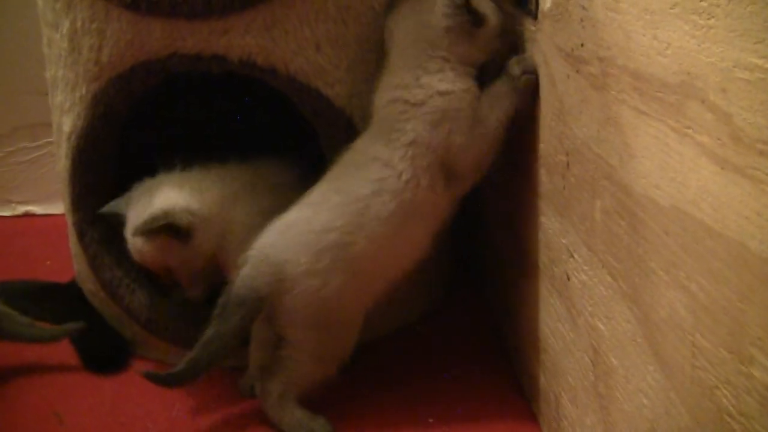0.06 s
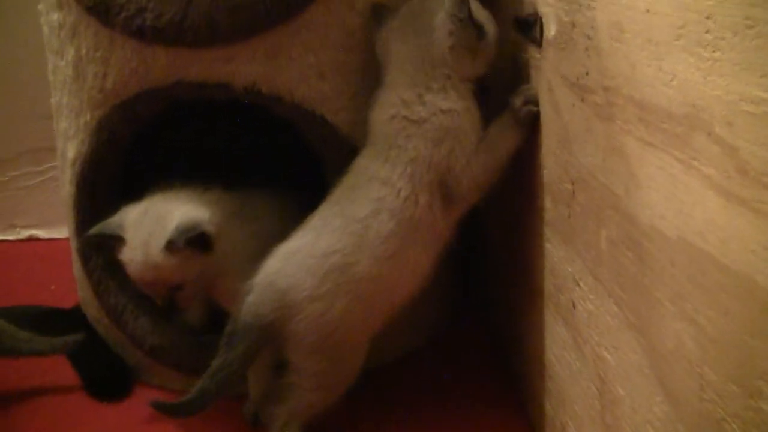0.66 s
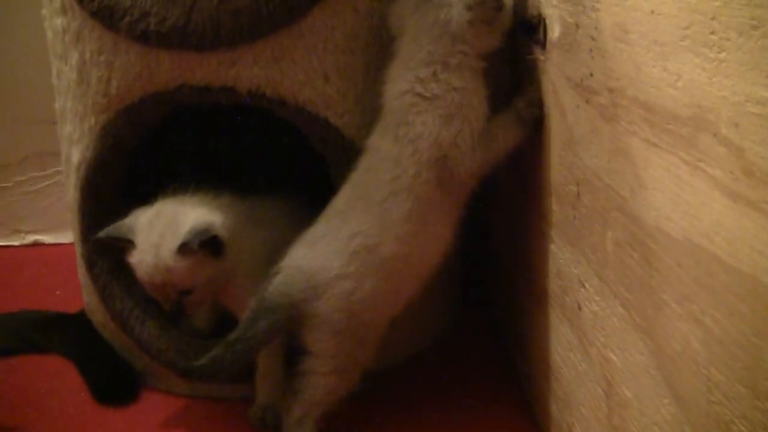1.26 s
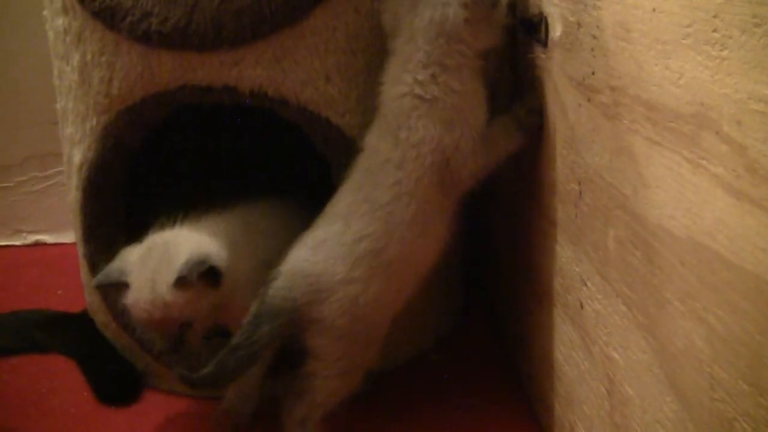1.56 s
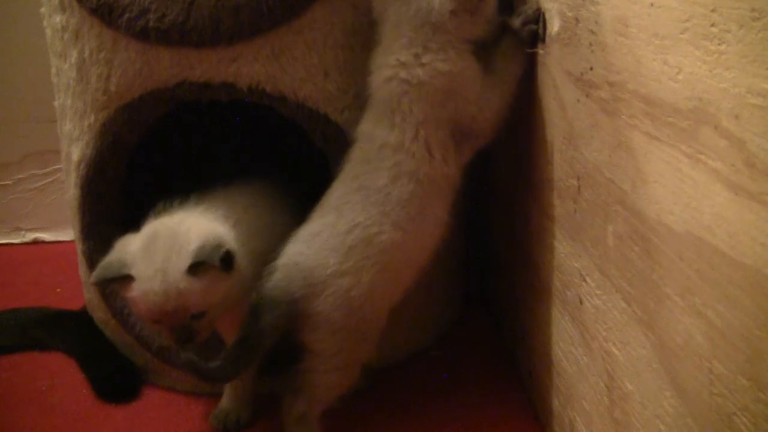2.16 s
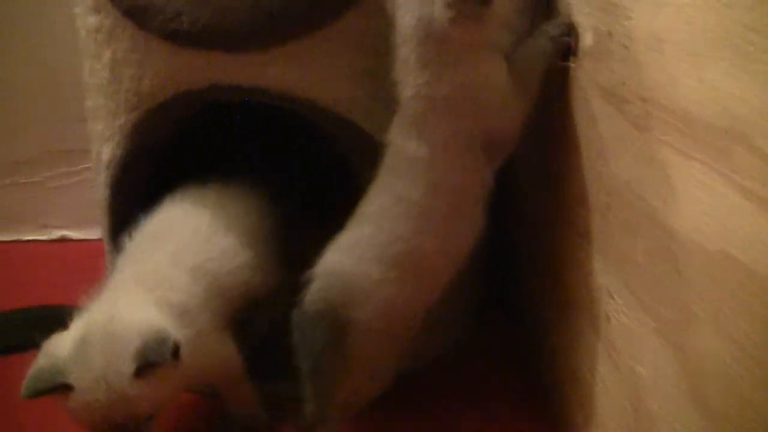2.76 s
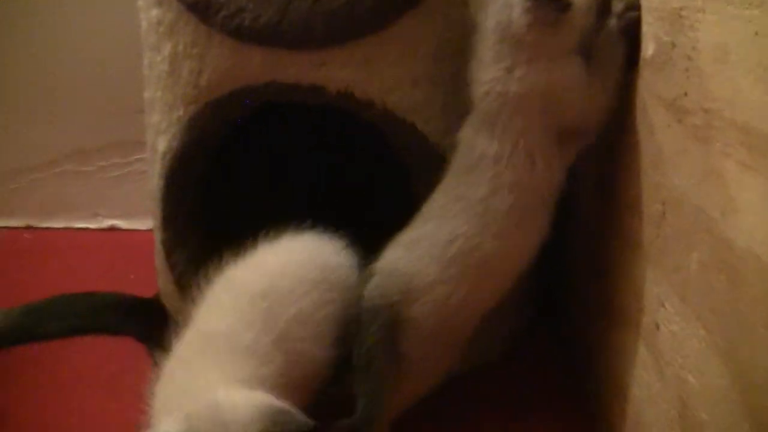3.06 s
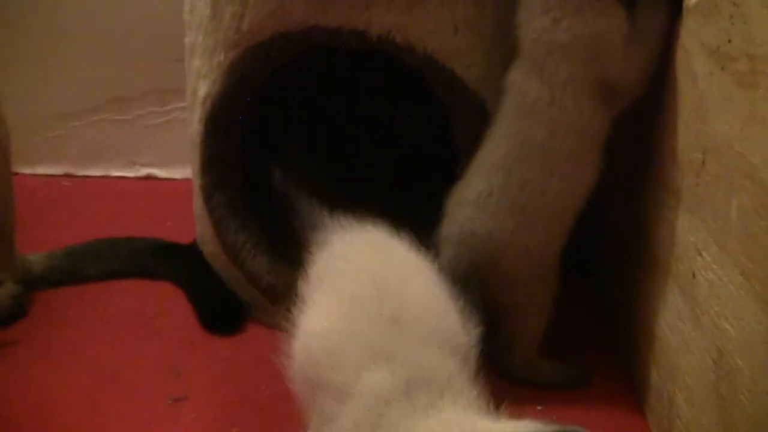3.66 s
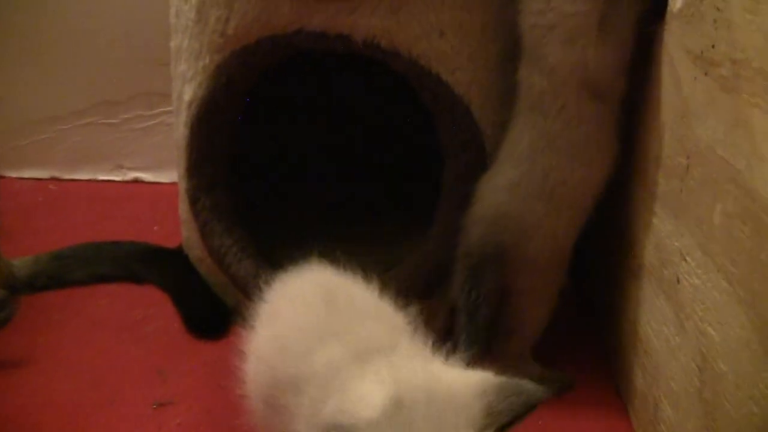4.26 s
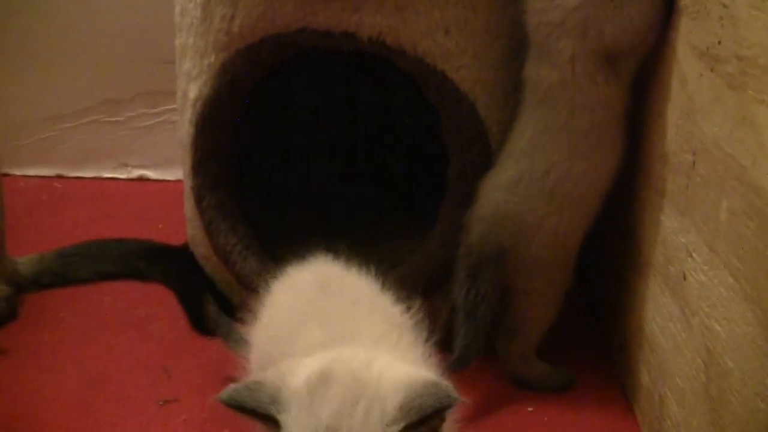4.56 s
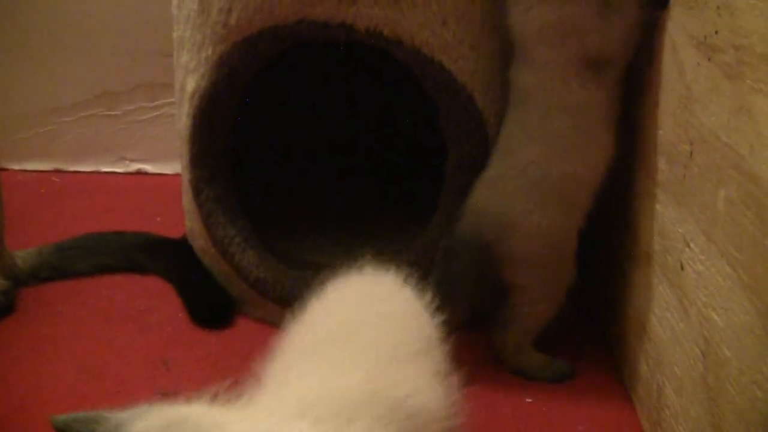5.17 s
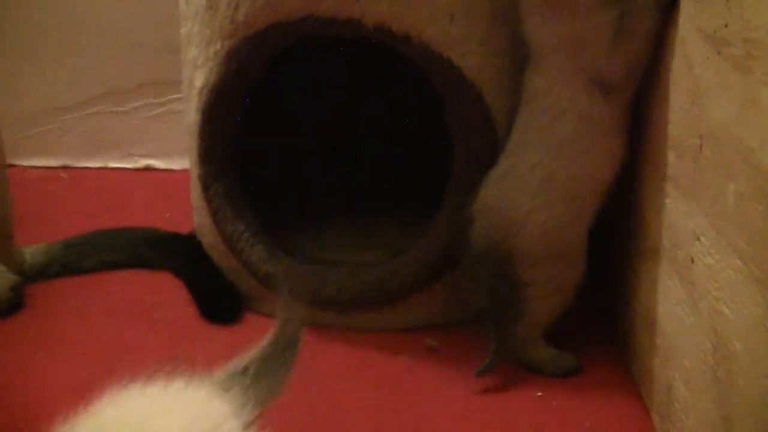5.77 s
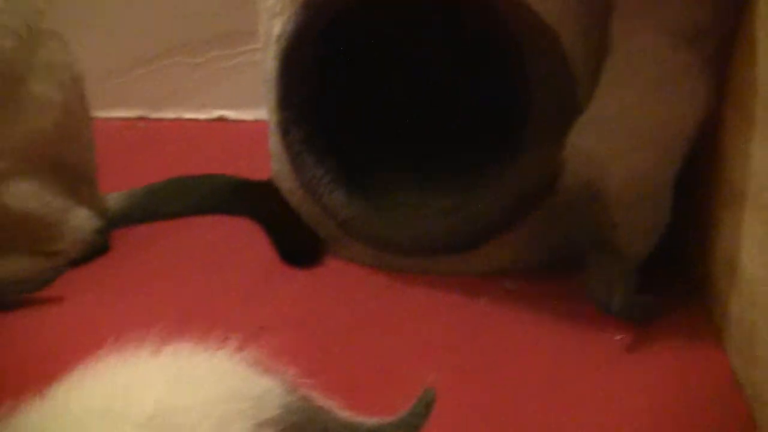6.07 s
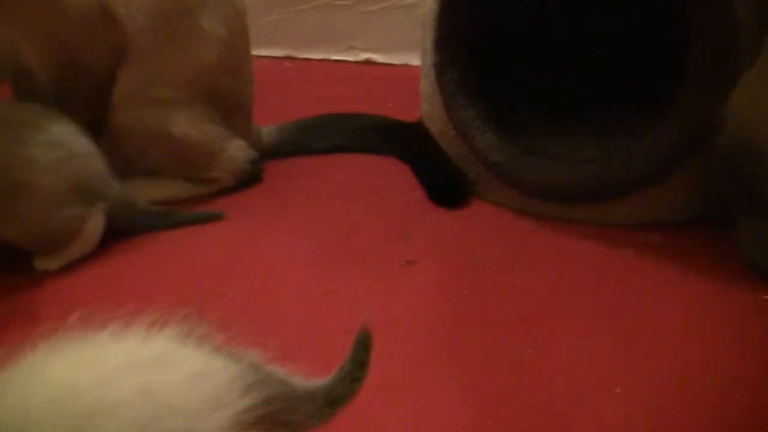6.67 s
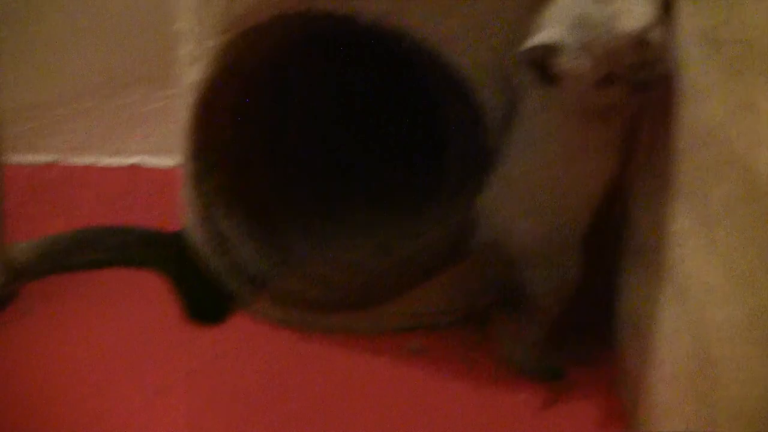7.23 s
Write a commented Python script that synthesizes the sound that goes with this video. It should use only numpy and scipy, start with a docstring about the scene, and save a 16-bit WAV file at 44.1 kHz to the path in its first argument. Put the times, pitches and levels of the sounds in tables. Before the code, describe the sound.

Small, close claw clicks and brief scrapes on wood, mixed with dull kitten footfalls, in a quiet room with faint rapid ticking.

```python
"""A small furnished room, the camera's microphone close to a plywood panel.
A kitten stands against the panel and paws at it; another pads out of a cat house.
Claws tap and drag, ringing the wood; soft paws thud on the hollow floor; the room answers briefly.
Under it lie room rumble, hiss, mains hum and the faint fast ticking of a small motor,
likely the camera's own."""
import sys
import numpy as np
from scipy import signal
from scipy.fft import rfft, irfft
from scipy.io import wavfile
from scipy.ndimage import uniform_filter1d

SR = 44100
rng = np.random.default_rng(int(sys.argv[2]) if len(sys.argv) > 2 else 0)


def transcribe(signal):
    """Save signal, clipped to [-1, 1], as a 16-bit WAV file at the path in sys.argv[1]."""
    frames = np.atleast_2d(signal).T
    limited = np.clip(frames, -1, 1)
    pcm = np.round(limited * 32767).astype(np.int16)
    wavfile.write(sys.argv[1], SR, pcm)


N = 330750
SIZE = 32768  # samples in one blow
HZ, T = np.fft.rfftfreq(SIZE, 1 / SR), np.arange(SIZE) / SR


def taps(usual_db=-46, usual_t60=0.097, halving_db=19.5, crunch_db=1, crunch_t60=0.009):
    """Close taps, nearly all claws on the panel: a click, a sharp push, a crunch of wood fibres."""
    # Each row: start in seconds, level in dB, weight in dB, brightness in dB per octave,
    # favoured note in Hz, its lift in dB.
    # The rows at 1.178 and 1.226 s are two faint 1.8 kHz ticks of the small motor.
    hits = [(0.212, -51, 4, 2, 3600, -4), (0.644, -55.5, 7, 0.5, 7000, 5), (0.826, -54, 16, -4, 302, 9.5),
            (0.864, -57, 4, -0.5, 4000, 6), (0.981, -55, 0, -1.5, 3200, 4), (1.178, -55, 7, -6, 1800, 14),
            (1.226, -61, 7, -3, 1800, 13), (1.859, -45, -9, -4, 650, 18), (2.14, -51.5, -6, -2.5, 2670, 3),
            (2.2007, -42, -5, 2.5, 3350, 6), (2.488, -38.5, -1, -3.5, 2140, 3.5),
            (2.494, -46.5, -7, -2.5, 5800, 1), (2.728, -52, 0, -2, 5400, 6),
            (2.9443, -43.5, 8, 2, 4660, 3.5), (3.125, -49.5, 13, 0.5, 1310, 18),
            (3.286, -35, 0.5, -2, 1320, 7), (3.334, -53.5, -8, -9, 2000, 6), (3.397, -45.5, 4, -5, 1130, 5),
            (3.4093, -29.5, -1, -7.5, 9800, 15), (3.4182, -34, -3, -3, 2400, 1),
            (3.493, -45, 6, -1.5, 1140, 11.5), (3.759, -44.5, 5.5, -3, 1050, 6),
            (3.79, -45, -0.5, -3, 1040, 6), (3.86, -55.5, -5, 0.5, 760, 2), (4.402, -51, -20, -3, 890, 1),
            (4.516, -49.5, 3.5, 0, 3670, 5), (4.851, -46.5, 13.5, 1.5, 1300, 14),
            (4.9091, -41.5, 12, 0, 1350, 10), (4.954, -55.5, 8, 3, 1130, 6),
            (5.008, -44, -2.5, -1.5, 885, 9), (5.122, -48.5, 9, -2.5, 890, 10),
            (5.235, -59, 4, -2.5, 10500, 25), (5.408, -51.5, -1, -1, 2600, 7), (5.87, -59, 7, 1, 1430, 12),
            (6.935, -36.5, 16.5, 0.5, 1370, 16.5), (7.271, -46, 5.5, -9.5, 1200, 1.5)]
    out = np.zeros((2, N))
    for start, db, weight_db, bright_db, spot_hz, spot_db in hits:
        force_db = db - usual_db
        bass_db = 4 + 0.7 * weight_db - 0.37 * force_db  # gentle taps are more pad than claw
        t60 = usual_t60 * 2 ** (-max(force_db, 0) / halving_db)  # hard taps press and damp the panel
        push = (T == 0) + amp(crunch_db) * unit(rng.standard_normal(SIZE) * fade(T, crunch_t60))
        add(out, start, panel(push, db, 0.02, bass_db, weight_db, bright_db, spot_hz, spot_db, t60))
        add(out, start, claw_tip(db - 1 + 1.5 * bright_db))
    return out


def claw_tip(db, click_s=0.0012, low_hz=3300, high_hz=9000, side_db=-8):
    """The tiny dry click of the claw itself, straight through the air to the microphone."""
    burst = rfft(rng.standard_normal((2, SIZE)) * np.exp(-T / click_s))
    band = 1 / (1 + (low_hz / (HZ + 1)) ** 4) / (1 + (HZ / high_hz) ** 6)
    return amp([[db], [db + side_db]]) * irfft(burst * causal(band))


def claw_scrapes():
    """Firm strokes of the claws down the panel."""
    # Each row: start and length in seconds, level in dB, paw weight in dB, brightness in dB per octave.
    strokes = [(0.213, 0.082, -44, 3.5, 0), (0.3, 0.035, -56, 6.5, 0), (0.652, 0.0086, -46.7, -8, -1),
               (0.993, 0.025, -46.5, 0, -3), (1.09, 0.025, -48, 6.5, -1.5), (1.158, 0.025, -54, -1, -6.5),
               (1.298, 0.043, -42.5, 1, -1.3), (1.418, 0.029, -45.5, 3.5, 0),
               (1.621, 0.02, -55.5, -0.5, -6), (1.862, 0.028, -48.5, 1.5, -3),
               (2.796, 0.014, -55, 2.5, -15), (2.923, 0.029, -46.5, 4, 2), (3.506, 0.021, -49, 0, -6),
               (3.683, 0.011, -52, 6, -10), (3.805, 0.037, -55.5, -2, -10), (4.26, 0.062, -60.5, 0, -8),
               (4.409, 0.014, -46, 0, -12), (4.434, 0.037, -53, -1, -1.5), (4.916, 0.082, -49, 2.5, -3),
               (5.023, 0.058, -52, 0, -5.5), (5.082, 0.048, -48, 7, -7), (5.647, 0.036, -53, 3, -2),
               (5.94, 0.023, -52, -3, -3), (6.45, 0.016, -58.5, -13, -5)]
    out = np.zeros((2, N))
    for start, length, db, weight_db, bright_db in strokes:
        add(out, start, claw_drag(length, db, weight_db, bright_db))
    return out


def claw_drag(length, db, weight_db, bright_db, slips_per_s=700, spread_db=4, catch=0.79, rub=0.13):
    """A dragged claw catches, then slips on the grain: many uneven pushes under one swelling stroke."""
    slips = rng.random(SIZE) < slips_per_s / SR
    slips = slips * amp(spread_db * np.minimum(rng.exponential(1, SIZE), 2))
    grip = np.interp(T / length, [0, 0.48, 1], [0.75, 1, 0.23], right=0)
    push = grip * (catch * (T == 0) + slips * rng.choice([-1, 1], SIZE) + rub * rng.standard_normal(SIZE))
    return panel(push, db, length, bass_db=3, knock_db=weight_db, bright_db=bright_db,
                 spot_hz=3600, spot_db=4, t60=0.073, scatter_db=-3)


def claw_fidgets(count=18, between_s=(0.7, 6.1), level_db=-61, spread_db=2):
    """Faint brief scuffs at loose intervals as the claws shift their hold."""
    out = np.zeros((2, N))
    for k, (when, size) in enumerate(rng.random((count, 2))):
        start = np.interp(k + when, [0, count], between_s)
        db = level_db + spread_db * (2 * size - 1)
        add(out, start, claw_drag(0.014, db, weight_db=-2, bright_db=-5))
    return out


def panel(push, db, span_s, bass_db, knock_db, bright_db, spot_hz, spot_db, t60, scatter_db=0):
    """Plywood rings under a push, in mid and side; db is its 400-8000 Hz level over span_s."""
    # Each row: a panel mode in Hz, its width in Hz, its lift over the broad response in dB.
    modes = [(89.5, 30, 12), (153, 21, 9), (333, 113, 7), (571, 82, 3), (481, 33, 7.5), (517.6, 22, 6.5),
             (632.6, 170, 14.5), (779, 12, 7.5), (1057, 54, 9.5), (1193, 48, 4), (1355, 250, 7.5),
             (1614, 18, 9.5), (1770, 18, 0.5), (1967, 73, 9), (1940, 23, 1), (2178, 75, 7.5), (2310, 24, 8),
             (2540, 33, 5), (2870, 460, 2.5), (2966, 48, 7), (3910, 74, 6)]
    # Each row: frequency in Hz, the wood's broad response in dB.
    wood = [(25, -41), (70, -10), (130, -5), (300, -2.5), (550, -7), (900, -8), (1400, -2.5), (3500, -3.5),
            (4600, -8.5), (7000, -14), (10300, -18), (11300, -33), (13000, -42), (16000, -56)]
    # Each row: frequency in Hz, side against mid in dB.
    wood_side = [(60, -26), (300, -31), (1300, -39), (2400, -19), (4400, -8), (9000, -4.5)]
    # bending waves run faster in the treble, so the first click is smeared
    travel_s = 0.0010164  # at 1 kHz
    direct = np.exp(-4j * np.pi * travel_s * np.sqrt(1000 * HZ))
    # they scatter off the edges, and the corner throws back one dull echo 3 ms later
    scatter = rfft(unit(rng.standard_normal((2, SIZE)) * fade(T, t60)))
    echo = amp(-1) * np.exp(-2j * np.pi * HZ * 0.002983) / (1 + 1j * HZ / 1100)
    mid = direct * (1 - echo) + amp(scatter_db) * scatter[0]
    side = amp(read(wood_side, HZ)) * scatter[1]
    waves = rfft(push, SIZE) * np.array([mid, side])
    # each spot favours other modes, most of all those around its own note
    modes_db = sum((lift + rng.standard_normal()) / (1 + (2 * (HZ - hz) / width) ** 2)
                   for hz, width, lift in modes)
    modes_db += spot_db * np.exp(-0.5 * (np.log2((HZ + 1) / spot_hz) / 0.3) ** 2)
    # the weight of the paw feeds the bass, the sharpness of the claw the treble
    touch_db = read([(190, bass_db), (420, knock_db), (700, knock_db), (1100, 0)], HZ)
    touch_db += bright_db * np.log2(np.maximum(HZ / 1500, 1))
    # chance sets the fine grain of a blow; wood and touch set its broad colour
    broad = np.sqrt(uniform_filter1d(abs(waves[0]) ** 2, size=800) + 1e-12)
    spectrum = waves * causal(amp(read(wood, HZ) + modes_db + touch_db) / broad)
    energy = 2 * np.sum(abs(spectrum[0, (HZ > 400) & (HZ < 8000)]) ** 2) / SIZE
    return irfft(spectrum) * amp(db) * np.sqrt(span_s * SR / energy)


def paw_thuds(gain_db=-1, rise_s=0.0027, t60=0.16, overtone_db=-7, puff_db=-11, puff_hz=300, side_db=-14):
    """A padded paw sets the hollow floor swinging for a few cycles, with a dull puff of carpet."""
    # Each row: start in seconds, relative level in dB, pitch of the floor in Hz.
    landings = [(1.861, -44, 91), (2.943, -41.5, 108), (3.288, -44, 147), (3.414, -42, 160),
                (3.543, -34.5, 91), (3.599, -46, 109.6), (5.036, -44, 169), (5.231, -49, 148),
                (5.719, -33.5, 107), (5.789, -48.5, 197), (6.22, -43.5, 100.6), (6.936, -38, 153),
                (7.271, -54, 96)]
    out = np.zeros((2, N))
    for start, db, hz in landings:
        swing = np.sin(2 * np.pi * hz * T) + amp(overtone_db) * np.sin(2 * np.pi * hz * 1.65 * T)
        puff = irfft(rfft(rng.standard_normal((2, SIZE))) / (1 + (HZ / puff_hz) ** 3))
        puff /= np.sqrt(np.mean(puff ** 2))
        envelope = amp(db + gain_db) * (1 - np.exp(-T / rise_s)) * fade(T, t60)
        add(out, start, envelope * np.array([swing + amp(puff_db) * puff[0], amp(side_db) * puff[1]]))
    return out


def room_tail(sound, mid_db=-15, side_db=-17, build_s=0.0047):
    """Near walls return a short diffuse tail, longest in the bass and shortest in the middle range."""
    # Each row: frequency in Hz, seconds to die away by 60 dB.
    decay_times = [(100, 0.53), (500, 0.11), (2000, 0.15), (10000, 0.35)]
    hz, t, noise = signal.stft(rng.standard_normal((2, SIZE)), SR, nperseg=256)
    envelope = fade(t, read(decay_times, hz)[:, None]) * (1 - np.exp(-t / build_s))
    tail = signal.istft(noise * envelope, SR, nperseg=256)[1]
    return amp([[mid_db], [side_db]]) * signal.fftconvolve(sound[:1], unit(tail), axes=1)[:, :N]


def motor_ticks(ticks_per_s=26.6, tick_db=-57.5, uneven_db=2.5, hard_db=-52, t60=0.032, side_db=-6):
    """A small motor ticks at an even pace into its housing, now and then harder."""
    # Each row: a housing mode in Hz, its width in Hz, its relative level in dB.
    housing = [(520, 450, 13.5), (772, 63, 4), (890, 250, -13.5), (1450, 140, -2), (1708, 44, -0.5),
               (2257, 81, -1.5), (2610, 124, 0)]
    # Each row: time in seconds, change in tick strength in dB.
    load = [(.7, -24), (1.3, 1.5), (7.5, 1.5)]
    # Each entry: start of a harder tick in seconds.
    hard_starts = [5.5868, 6.25, 6.52, 6.7366]
    out, t = np.zeros((2, N)), T[:SIZE // 8]
    ring = sum(amp(db) * np.exp(-np.pi * width * t) * np.sin(2 * np.pi * (hz * t + rng.random()))
               for hz, width, db in housing)
    ring *= 1 - np.exp(-t / 0.0017)  # softened onset
    beats = np.arange(0, N / SR, 1 / ticks_per_s)
    beat_db = tick_db + np.interp(beats, *np.transpose(load))
    beat_db += uneven_db * rng.standard_normal(len(beats))
    for start, db in [*zip(beats, beat_db), *[(s, hard_db) for s in hard_starts]]:
        rattle = unit(rng.standard_normal((2, len(t))) * fade(t, t60))
        tick = unit(signal.fftconvolve(rattle, ring[None], axes=1)) * np.linalg.norm(ring)
        add(out, start, amp([[db], [db + side_db]]) * tick)
    return out


def room_tone(noise_db=-58.5):
    """Steady room rumble and microphone hiss with a little mains hum."""
    # Each row: frequency in Hz, relative density of rumble and hiss in dB.
    colour = [(12, -28), (25, -1.5), (54, -7.5), (80, -1), (116, 1), (150, -4), (235, -3.5), (290, -8),
              (700, -11), (1500, -14.5), (3600, -22.5), (6500, -27.5), (10500, -32), (15500, -39)]
    # Each row: frequency in Hz, side against mid in dB.
    width = [(60, -3), (110, -12.5), (200, -0.5), (380, 6.5), (700, 3.5), (1290, 1), (2380, -1), (4400, -1),
             (8120, -1.5), (15000, 0)]
    # Each row: a mains harmonic in Hz, its level in dB.
    mains = [(60, -68.5), (120, -73), (240, -74)]
    hz, t = np.fft.rfftfreq(N, 1 / SR), np.arange(N) / SR
    noise = rfft(rng.standard_normal((2, N))) * amp(read(colour, hz))
    mid, side = irfft(noise[0], N), irfft(noise[1] * amp(read(width, hz)), N)
    hum = sum(np.sqrt(2) * amp(db) * np.sin(2 * np.pi * (f * t + rng.random())) for f, db in mains)
    return amp(noise_db) * np.array([mid, side]) / mid.std() + np.array([hum, np.zeros(N)])


def amp(db):
    """Decibels to gain."""
    return 10 ** (np.asarray(db) / 20)


def unit(x):
    """Scales each row to energy 1."""
    return x / np.linalg.norm(x, axis=-1, keepdims=True)


def read(points, hz):
    """Reads a table on a log-frequency axis."""
    f, value = np.transpose(points)
    return np.interp(np.log(hz + 1), np.log(f + 1), value)


def fade(t, t60):
    """Free decay of a ring, 60 dB down after t60 seconds."""
    return np.exp(-np.log(1000) * t / t60)


def add(mix, start, sound):
    """Adds a mid and side sound at start seconds."""
    part = mix[:, max(round(start * SR), 0):][:, :sound.shape[1]]
    part += sound[:, :part.shape[1]]


def causal(gain):
    """Gives a gain curve the phase that makes it ring only after the blow."""
    log_gain = np.log(np.maximum(gain, 1e-5))
    mirrored = np.r_[log_gain, log_gain[-2:0:-1]]
    return np.exp(np.conj(signal.hilbert(mirrored)))[:len(gain)]


def scene():
    """Kittens up close, the room behind; mid and side become left and right, the left a touch louder."""
    close = taps() + claw_scrapes() + paw_thuds() + claw_fidgets()
    mid, side = close + room_tail(close) + room_tone() + motor_ticks()
    return np.array([mid + side, mid - side]) * amp([[0.12], [-0.12]])


def record(dry, edge_hz=15800):
    """The camera cuts off the highest treble."""
    lowpass = signal.firwin(511, edge_hz, window=("kaiser", 9), fs=SR)
    return signal.oaconvolve(dry, lowpass[None], "same")


dry = scene()
out = record(dry)
transcribe(out)
```